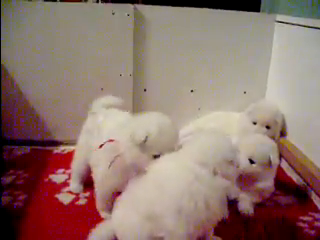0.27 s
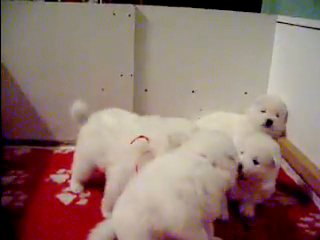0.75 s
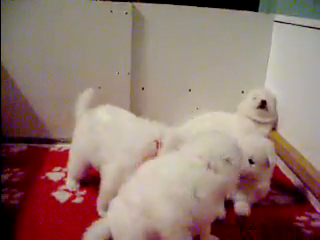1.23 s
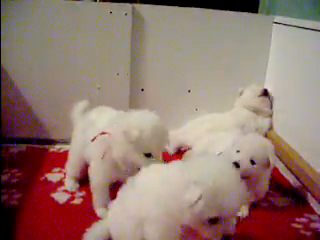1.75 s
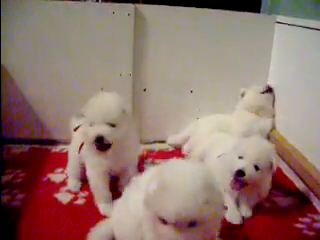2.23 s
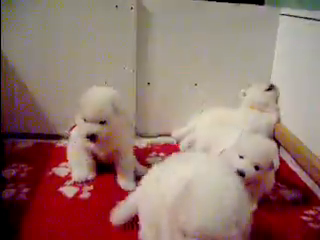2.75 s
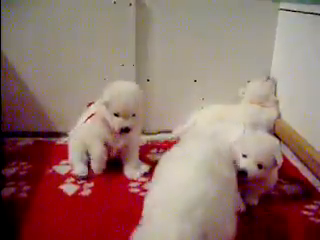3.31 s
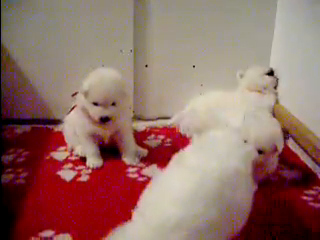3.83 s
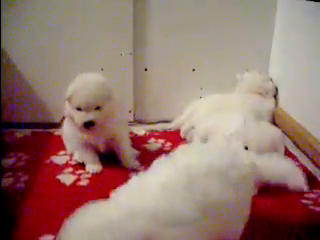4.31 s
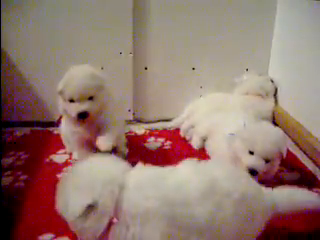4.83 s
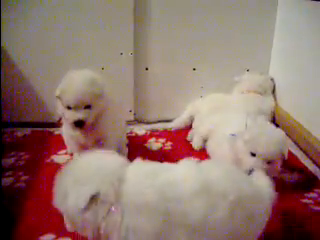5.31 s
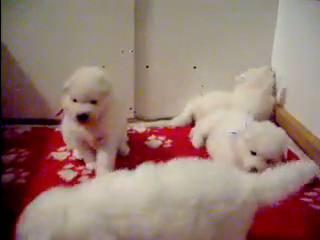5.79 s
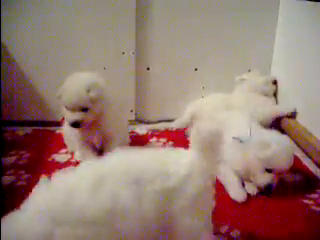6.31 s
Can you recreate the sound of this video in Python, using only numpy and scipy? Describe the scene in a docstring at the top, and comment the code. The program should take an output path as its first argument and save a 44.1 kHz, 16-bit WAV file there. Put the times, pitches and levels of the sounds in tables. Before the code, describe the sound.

Over constant grainy camera hiss, young puppies give short high yips and one piercing yelp, with light paw thumps and faint fur swishes.

```python
"""Puppies at play

Close by on a carpet in a small room: soft bumps of paws, a few thin yips, one loud high yelp, a second yelp, fur brushing.
Each cry is a nearly pure whistle whose pitch arches up and falls, with overtones that flare as they pass
through the mouth's resonance; bumps are short padded rings and brushes are swishes of narrow noise.
A small hissy camera samples coarsely, so overtones are mirrored, and turns its gain down after the loud yelp."""
import sys
import numpy as np
from scipy import signal
from scipy.fft import rfft, irfft, next_fast_len
from scipy.io import wavfile
from scipy.ndimage import uniform_filter1d, map_coordinates

SR = 44100
rng = np.random.default_rng(int(sys.argv[2]) if len(sys.argv) > 2 else 0)


def to_wav(s):
    """Save 16-bit WAV."""
    ch = np.atleast_2d(s).T  # columns
    pcm = np.round(np.clip(ch, -1, 1) * 32767)  # PCM
    wavfile.write(sys.argv[1], SR, pcm.astype(np.int16))


N = 288855
TIME = np.arange(N) / SR  # s
HOLD_COUNT = 4  # the camera holds each sample for this many steps

# courses of the loud yelp and the second one: time_s, pitch_hz, fundamental_db, octave_db, upper_overtones_db
LOUD_YELP = [(2.589, 931.5, -41.5, -50, -54), (2.601, 1010, -43, -25.5, -33),
             (2.617, 1142, -28, -32.5, -15.5), (2.631, 1259, -21.5, -22.5, -26.5),
             (2.659, 1381, -16, -25.5, -14), (2.679, 1479, -16, -35.5, -15.5),
             (2.697, 1399, -23.5, -54.5, -26), (2.723, 1200, -36.5, -28, -39),
             (2.737, 1127, -47, -38.5, -33.5), (2.751, 1066, -36, -28.5, -43),
             (2.76, 1027, -52, -34.5, -54.5)]
SECOND_YELP = [(4.883, 869.4, -53, -38, -54), (4.893, 910.2, -46.5, -24.5, -40),
               (4.909, 1092, -46, -24, -37.5), (4.921, 1191, -46, -34, -29), (4.937, 1322, -52, -35, -41.5),
               (4.943, 1333, -63, -35.5, -36), (4.959, 1353, -39.5, -52, -47), (4.985, 1289, -44, -45, -43),
               (4.999, 1179, -47, -48, -46.5), (5.017, 1109, -50, -27.5, -47.5),
               (5.037, 951, -42.5, -26.5, -53)]


def amp(db):
    """Decibels to amplitude."""
    return 10 ** (np.asarray(db) / 20)


def unit(x):
    """x scaled to an rms of one."""
    return x / np.sqrt(np.mean(x ** 2) + 1e-20)


def along(points, hz):
    """Read a curve of (frequency, value) points on a log frequency axis."""
    point_hz, value = np.transpose(points)
    return np.interp(np.log(hz + 1e-9), np.log(point_hz), value)


def filtered(x, response):
    """Shape the spectrum of x by a response of frequency."""
    padded = next_fast_len(N + SR // 2)
    spectrum = rfft(x, padded) * response(np.fft.rfftfreq(padded, 1 / SR))
    return irfft(spectrum, padded)[:N]


def wobble(t, rate):
    """A smooth random curve over the times t, with rate knots a second."""
    position = (t - t[0]) * rate
    knots = rng.standard_normal(int(position[-1]) + 4)
    return map_coordinates(knots, [position])


def hiss(level_db=-52):
    """Even microphone noise, heavier in the bass, up to half the coarse sampling rate."""
    # colour of the microphone's noise: frequency_hz, relative_level_db
    colour = [(20, 17.5), (50, 8.5), (110, 7), (330, 3.5), (800, 3), (3600, 2.5), (5500, 3)]
    noise = rng.standard_normal(N)
    return amp(level_db) * unit(filtered(noise, lambda hz: amp(along(colour, hz)) * (hz < SR / HOLD_COUNT / 2)))


def bumps(scuff=0.48):
    """Paws and bodies hit floor and boards: padded blows swell and fade within a few cycles of what they hit."""
    # the blows: peak_s, ring_hz, ring_level_db, length_s
    blows = [(1.248, 572, -56, 0.016), (1.756, 590, -58, 0.014), (4.197, 244, -43, 0.006),
             (4.221, 202, -52, 0.022), (4.424, 252, -48.5, 0.016), (5.759, 589, -46.5, 0.0059),
             (6.165, 314, -51, 0.0062), (6.345, 285, -58, 0.011)]
    out = np.zeros(N)
    for peak_s, hz, db, length in blows:
        span = abs(TIME - peak_s) < .1
        t = TIME[span] - peak_s
        swell = np.exp(-(t / length) ** 2)
        ring = np.cos(2 * np.pi * hz * t)
        out[span] += amp(db) * swell * (ring + scuff * wobble(t, 1600))
    return out


def room(x, tail_db=-18, walls_db=-17):
    """Near boards throw back a few weak copies; the room then rings briefly. Returns the echo alone."""
    # how long the room rings: frequency_hz, t60_s
    ring_times = [(200, 0.17), (1400, 0.53), (2200, 0.56), (4000, 0.39), (8000, 0.12)]
    hz, t, noise = signal.stft(rng.standard_normal(SR // 2), SR, nperseg=256)
    decay = amp(-60 * t / along(ring_times, hz)[:, None])
    build_up = 1 - np.exp(-t / 0.0057)
    tail = signal.istft(noise * decay * build_up, SR, nperseg=256)[1]
    answer = amp(tail_db) * tail / np.linalg.norm(tail)
    delays = rng.uniform(0.0019, 0.033, size=8)  # s, to the boards and back
    answer[(delays * SR).astype(int)] += amp(walls_db) / np.sqrt(len(delays))
    return signal.fftconvolve(x, answer)[:N]


def cry(rough, sharp, mouth_hz, rows, edge=0.0055, jitter=0.066, flutter_hz=900, air_db=-13):
    """Tight vocal folds whistle on one pitch; strain shakes pitch and size and adds a rasp."""
    # the mouth's resonance: frequency as a ratio to the resonance, level_db
    mouth_curve = [(.6, -24.5), (.75, -33), (.88, -2), (1, 0.5), (1.12, -2), (1.3, -8), (1.7, -9.5),
                   (2.1, -28), (3, -49.5)]
    # the throat's fixed colour on the upper overtones: frequency_hz, level_db
    throat = [(3000, 0), (3400, 1.5), (4400, 0), (5100, 0), (5500, -4), (5800, -10), (6200, -3), (6700, 0),
              (7300, -5)]
    # air through the throat: frequency_hz, relative_level_db
    air_colour = [(500, -33), (1300, -9), (2300, -2), (4200, 5), (5500, -4), (8000, -36.5)]
    s, pitch, low_db, octave_db, upper_db = np.transpose(rows)
    span = (TIME > s[0] - edge) & (TIME < s[-1] + edge)
    t = TIME[span]
    shake = rough * jitter * wobble(t, flutter_hz) + 0.0009 * wobble(t, 128)
    hz = np.interp(t, s, pitch) * (1 + shake)
    phase = 2 * np.pi * np.cumsum(hz) / SR
    low, octave, upper = (amp(np.interp(t, s, db)) for db in (low_db, octave_db, upper_db))

    # the mouth's resonance slides from its first to its last frequency; each upper overtone flares in passing
    mouth = np.linspace(*mouth_hz, len(t))
    sizes = [low, octave]
    for k in np.arange(3, 10):
        flare_db = sharp * along(mouth_curve, k * hz / mouth)
        sizes.append(upper * amp(flare_db + along(throat, k * hz)))
    voice = np.zeros(len(t))
    for k, size in enumerate(sizes, 1):
        voice += size * (1 + rough * wobble(t, flutter_hz)) * np.sin(k * phase)

    # air rushes for the whole cry, in one puff a cycle
    rush = unit(filtered(rng.standard_normal(N), lambda f: amp(along(air_colour, f))))
    air = rush[span] * (1 + np.sin(phase))
    strength = low + octave + upper
    rasp = rough * amp(air_db) * np.sqrt(strength * strength.mean()) * air
    gate = np.clip(np.minimum(t - t[0], t[-1] - t) / edge, 0, 1)
    out = np.zeros(N)
    out[span] = np.sqrt(2) * gate * (voice + rasp)
    return out


def yip_course(s, rise, fall, start_hz, top_hz, end_hz, broken_hz, low_db, octave_db, upper_db, swell_db, growth_db):
    """The pitch arches over its top and breaks downwards at the end, where the overtones fade."""
    # the throat's colour on a yip's octave: pitch_hz of the fundamental, level_db
    octave_colour = [(1300, -3), (1620, 0), (2020, 0), (2200, -11), (2400, -4)]
    rise_bend, fall_bend = 2.2, 1.4  # powers of the pitch arch on either side of its top
    onset_s, onset_db = 0.0072, 2.5  # fundamental and upper overtones start this much softer, for this long
    low_swell_db = 1.5  # the fundamental grows towards the middle
    break_s, break_hold_s = .003, .01
    break_dull_db, break_lift_db = 13.5, 0.5  # loss of the overtones, gain of the fundamental

    voiced = rise + fall
    t = np.linspace(0, voiced + break_s + break_hold_s, 100)
    before = np.clip(1 - t / rise, 0, 1)
    after = np.clip((t - rise) / fall, 0, 1)
    broken = np.clip((t - voiced) / break_s, 0, 1)
    hz = top_hz + (start_hz - top_hz) * before ** rise_bend
    hz += (end_hz - top_hz) * after ** fall_bend
    hz += (broken_hz - end_hz) * broken

    progress = np.clip(t / voiced, 0, 1)
    swell = np.sin(np.pi * progress)
    soft_db = -onset_db * np.clip(1 - t / onset_s, 0, 1)
    bright_db = swell_db * swell - break_dull_db * broken
    low = low_db + soft_db + low_swell_db * swell + break_lift_db * broken
    octave = octave_db + bright_db + growth_db * (progress - .5) + along(octave_colour, hz)
    upper = upper_db + soft_db + bright_db
    return np.transpose([s + t, hz, low, octave, upper])


def yips():
    """Thin short whistles, smooth and through a narrow mouth resonance, each with its own echo."""
    # the yips: start_s, rise_s, fall_s, start_hz, top_hz, end_hz, broken_hz (after the break),
    # fundamental_db, octave_db, upper_overtones_db, overtone_swell_db,
    # octave_growth_db (start to end), mouth_resonance_hz, echo_db
    yip_list = [(2.052, 0.0024, .015, 803, 780, 684, 635, -47.5, -45, -71, 2.5, 5, 4370, 1),
                (2.286, .043, .055, 1038, 1190, 950, 850, -46, -46, -49.5, -5, 15.5, 4490, 3.5),
                (3.0, 0.0075, .039, 872, 864, 774, 710, -56.5, -36.5, -63, 9.5, 6.5, 4200, 2.5),
                (4.652, 0.0035, .024, 820, 829, 795, 782, -44, -51.5, -73, 4, 8, 4000, 4.5),
                (5.247, 0.027, 0.071, 933, 1040, 945, 780, -46, -34, -48.5, -7.5, -4, 4030, 1.5)]
    out = np.zeros(N)
    for *course, mouth_hz, echo_db in yip_list:
        voice = cry(.05, 2, (mouth_hz, mouth_hz), yip_course(*course))
        out += voice + amp(echo_db) * room(voice)
    return out


def yelps():
    """The loud yelp and the second one: rougher whistles whose mouth resonance climbs, each with its own echo."""
    # the yelps: course, roughness (0-1), sharpness of the mouth resonance, echo_db, mouth_start_hz, mouth_end_hz
    yelp_list = [(LOUD_YELP, .085, 1.26, 0, 3500, 4180), (SECOND_YELP, 0.16, 1.02, 1, 3420, 4660)]
    out = np.zeros(N)
    for course, rough, sharp, echo_db, *mouth_hz in yelp_list:
        voice = cry(rough, sharp, mouth_hz, course)
        out += voice + amp(echo_db) * room(voice)
    return out


def brushes(width_hz=300):
    """Fur brushes past: short soft swishes of narrow noise."""
    # the swishes: peak_s, centre_hz, level_db, length_s
    swishes = [(3.24, 2570, -55, 0.019), (4.427, 2540, -56, .018), (4.69, 2490, -55, 0.022)]
    out = np.zeros(N)
    for peak_s, centre, db, length in swishes:
        noise = rng.standard_normal(N)
        swish = unit(filtered(noise, lambda hz: 1 / (1 + ((hz - centre) / width_hz) ** 2)))
        out += amp(db) * np.exp(-((TIME - peak_s) / length) ** 2) * swish
    return out


def scene():
    """Bumps, yips, yelps and brushes in the room, over the hiss."""
    play = bumps() + brushes()
    return (hiss() + play + room(play) + yips() + yelps())[None]


def gain_step(x, cut_db=-4.5, click=0.014, click_decay=0.0036):
    """The first loud sound switches the gain down for a while; each switch shifts the amplifier's bias with a tick."""
    threshold = .1  # rms amplitude
    wait, hold = .083, 1.43  # s, from the loud sound to the cut, and the end of the cut counted from there
    bias, bias_shift = -.0216, -.0089
    level = np.sqrt(abs(uniform_filter1d(x ** 2, SR // 200)))  # over 5 ms
    loud_s = np.min(TIME[level > threshold], initial=TIME[-1])
    since = TIME - loud_s - wait
    down = ((since > 0) & (since < hold)).astype(float)
    tick = signal.lfilter([1, -1], [1, -np.exp(-1 / (click_decay * SR))], down)
    return x * amp(cut_db * down) + bias + bias_shift * down - click * tick


def coarse_sampling(x, slip_samples=1.26):
    """Samples held at a low rate mirror the overtones; timing drifts and slips back each buffer, ticking in loud cries."""
    buffer_s, first_s = .04128, .0367
    at = np.arange(0, N, HOLD_COUNT)
    progress = ((at / SR - first_s) / buffer_s) % 1
    slip = slip_samples * (.5 - progress)  # in held samples
    held = map_coordinates(x, [at + HOLD_COUNT * slip], mode="nearest")
    return np.repeat(held, HOLD_COUNT)[:N]


def record(dry):
    """The camera steps its gain, samples coarsely and keeps nothing above its band limit."""
    top_hz, slope_hz = 7030, 300
    held = coarse_sampling(gain_step(dry[0]))
    return filtered(held, lambda hz: np.clip((top_hz - hz) / slope_hz + .5, 0, 1))[None]


dry = scene()
out = record(dry)
to_wav(out)
```